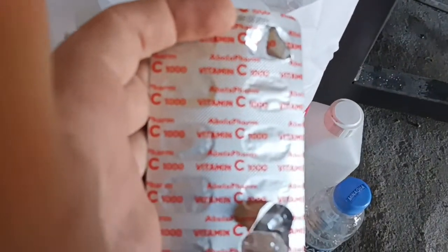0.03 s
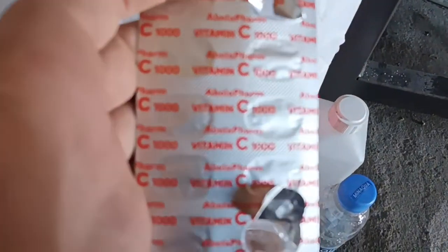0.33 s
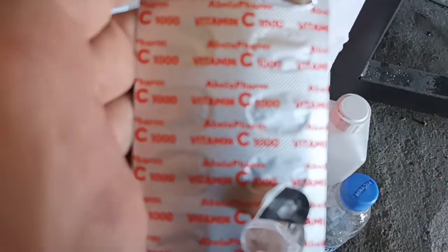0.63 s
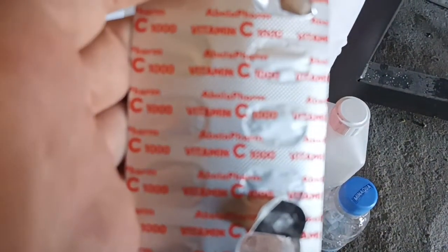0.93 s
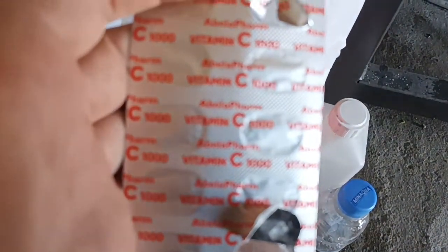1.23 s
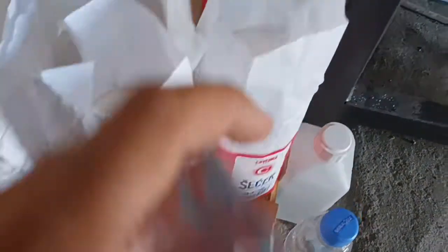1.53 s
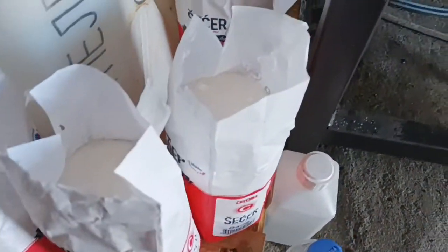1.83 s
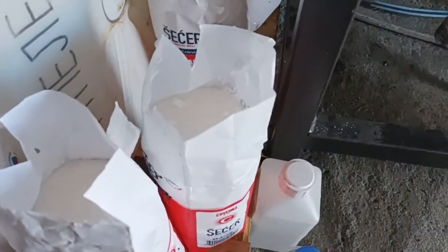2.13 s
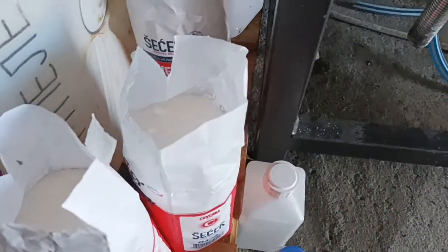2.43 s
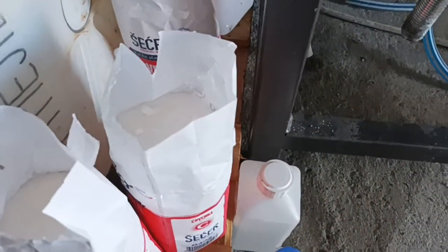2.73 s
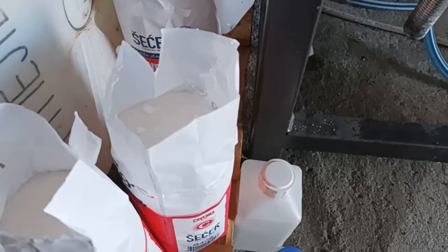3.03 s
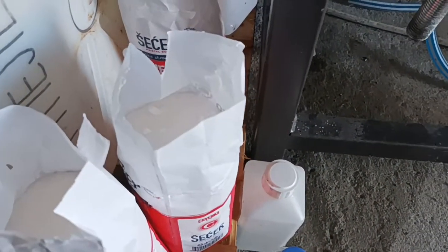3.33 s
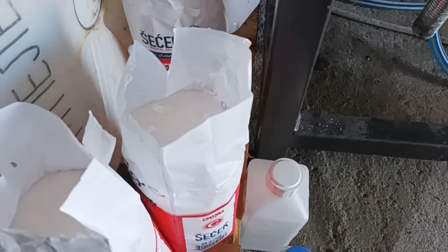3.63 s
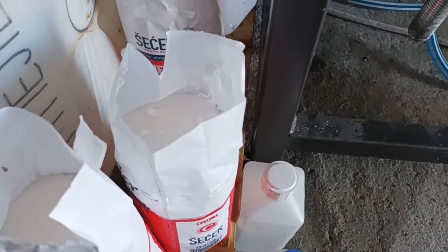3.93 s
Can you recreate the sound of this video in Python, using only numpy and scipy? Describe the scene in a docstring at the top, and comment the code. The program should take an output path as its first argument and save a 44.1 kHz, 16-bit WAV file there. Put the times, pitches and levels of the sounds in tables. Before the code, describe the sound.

Sharp snaps and crinkles of a foil pill pack give way to dense paper sack rustling.

```python
"""Sharp snaps of a foil blister pack, close to a phone, then separate crackles as it is moved aside.
Each blister flips, cracks and rings the foil sheet; fingers bump and skid over the pack.
Then a paper sack of sugar rustles densely, with sliding grains and sharp creases, in a small hard room.
Nearly all of it reaches the right microphone; the left one carries only a dull hiss."""
import sys
import numpy as np
from scipy import signal
from scipy.fft import rfft, irfft, next_fast_len
from scipy.io import wavfile

SR = 44100
rng = np.random.default_rng(int(sys.argv[2]) if len(sys.argv) > 2 else 0)


def materialize(psi):
    """Save the field psi as 16-bit PCM at rate SR to the path in sys.argv[1].

    A 1-D psi becomes a single channel; in a 2-D psi each row is a channel.
    """
    bounded = np.clip(np.atleast_2d(psi).T, -1, 1)
    quanta = np.round(bounded * 32767).astype(np.int16)
    wavfile.write(sys.argv[1], SR, quanta)


N = 176400

# blister flips (time [s], level [dB], pitch [Hz], t60 [s], second mode [Hz], then relative levels:
# second mode [dB], sheet [dB], crack [dB], air push [dB])
BLISTER_SNAPS = [(0.234, -55, 6250, 0.0091, 7450, -4, -8, 2, -30),
                 (0.4387, -20.5, 2167, 0.027, 5410, -19, 2, -6, -36),
                 (0.531, -33, 2110, 0.02, 1650, -1, -16, -6, -23),
                 (0.534, -20, 2380, 0.025, 4280, -3, 5.5, 0.5, -14.5),
                 (1.44, -37, 1880, 0.022, 2150, 9, -6, -29, -5),
                 (1.4538, -11.5, 2955, 0.014, 2220, -1, -16, -2.5, -22.5),
                 (1.4853, -15, 2300, 0.022, 7060, -8, -8, 0.5, -36),
                 (1.545, -29, 1830, 0.034, 2200, 3, -16, 6.5, -23),
                 (1.6103, -15, 2390, 0.024, 2620, -7, -24, 5.5, -15),
                 (1.969, -16.5, 2625, 0.022, 3024, -1.5, -2.5, -5.5, -30),
                 (2.0617, -14, 2450, 0.022, 4050, -11.5, -23, -20, -30),
                 (2.1341, -17, 2714, 0.029, 4410, -11, -24, -3.5, -43),
                 (2.173, -24, 2340, 0.031, 2760, -3, -10, -18, -17),
                 (2.181, -21.5, 2417, 0.031, 4420, -12, -10, -6, -30)]
# foil sheet modes (frequency [Hz], level [dB], t60 [s])
SHEET_MODES = [(3200, -4.5, 0.017), (3350, 2, 0.011), (3583, -7.5, 0.023), (5280, -30.5, 0.033),
               (5940, -19, 0.026), (7140, -20.5, 0.014), (8670, -23, 0.018)]
# crack spectrum (frequency [Hz], level [dB])
CRACK_SPECTRUM = [(100, -37), (500, -37), (1100, -32), (1800, -10), (2600, 2), (3600, -2.5), (5200, -11),
                  (7000, -6), (9000, -11.5), (11000, -26.5), (16000, -27)]


def blister_snaps():
    """A blister flips: it cracks, pushes the air, rings in two modes and shakes the foil sheet."""
    out, t = np.zeros(N), np.arange(SR // 20) / SR
    rise_s = 0.00092
    rise = np.sin(np.pi / 2 * np.minimum(t / rise_s, 1)) ** 2
    sheet = sum(undb(db) * ring(t, hz, t60_s) for hz, db, t60_s in SHEET_MODES)
    for time_s, db, hz, t60_s, mode2_hz, mode2_db, sheet_db, crack_db, push_db in BLISTER_SNAPS:
        blister = ring(t, hz, t60_s) + undb(mode2_db) * ring(t, mode2_hz, 0.8 * t60_s)
        crack = undb(crack_db - 7.5) * burst(t, CRACK_SPECTRUM, decay_s=0.0029)
        push = undb(push_db) * ring(t, hz=1120, t60_s=0.0087)
        snap = rise * (blister + undb(sheet_db) * sheet + crack) + push
        add(out, time_s, undb(db - 5.5) * snap)
    return out


# foil buckles (time [s], level [dB], pitch [Hz])
FOIL_CRACKLES = [(1.553, -38, 2300), (1.5762, -34, 2580), (1.5893, -26, 4500), (1.5945, -20.5, 1870),
                 (1.596, -34, 4020), (1.6078, -23, 4430), (1.6148, -27, 3840), (1.6262, -31, 7350),
                 (1.627, -29.5, 10500), (1.6336, -20.5, 4000), (1.6339, -27.5, 9200), (1.655, -29, 4500),
                 (1.6578, -18, 4940), (1.6652, -30, 3900), (1.6821, -26, 2270), (1.6855, -25, 1900),
                 (1.6925, -41, 8000), (1.7001, -27, 1370), (1.7043, -21, 4400), (1.7108, -25.5, 8400),
                 (1.7125, -19.5, 4560), (1.717, -28, 3650), (1.7275, -21, 4100), (1.7323, -18, 5140),
                 (1.7394, -17, 4800), (1.7436, -17, 5600), (1.7605, -28, 4960), (1.7674, -17.5, 3250),
                 (1.786, -32, 3370), (1.8645, -30, 5400), (1.914, -31, 2460), (2.0345, -37.5, 4270),
                 (2.0575, -28.5, 4970), (2.0635, -25, 4930), (2.1482, -32.5, 4530), (2.172, -34, 5200),
                 (2.1812, -29.5, 4760), (2.218, -33.5, 6170)]
# foil fracture spectrum (frequency [Hz], level [dB])
FOIL_SPECTRUM = [(100, -38), (600, -28), (1400, -10.5), (2400, -6.5), (4500, 1), (6200, 5.5), (8000, 1.5),
                 (10000, -18.5), (12000, -22), (16000, -29)]


def foil_crackles():
    """Foil folds buckle in bright ticks that barely ring."""
    return folds(FOIL_CRACKLES, FOIL_SPECTRUM, rise_s=0.00055, decay_s=0.0021, burst_db=-8,
                 ring_t60_s=0.0042, ring_db=-6)


# paper buckles (time [s], level [dB], pitch [Hz])
PAPER_CREASES = [(2.2555, -30.5, 3980), (2.262, -28, 3660), (2.2822, -27, 3400), (2.4655, -21, 1660),
                 (2.4662, -22, 4600), (2.5163, -25, 3270), (2.5402, -25, 4950), (2.544, -22, 3100),
                 (2.5495, -22, 2290), (2.6092, -21.5, 2420), (2.7412, -24, 2500), (2.7668, -22, 2610),
                 (2.8122, -19, 3500), (2.8128, -30, 6540), (2.823, -21, 3320), (2.892, -22, 2680),
                 (2.899, -19.5, 2780), (2.8995, -29.5, 5190), (2.9855, -25.5, 4380), (2.989, -18.5, 2900),
                 (3.109, -27.5, 2900), (3.143, -24, 2580), (3.1435, -28, 7440), (3.185, -21.5, 1800),
                 (3.2981, -24, 3080), (3.3445, -17.5, 2750), (3.4946, -41, 2600), (3.5131, -17.5, 2680),
                 (3.625, -32, 5600), (3.6498, -21, 1800), (3.7328, -25.5, 3100), (3.7332, -27.5, 6440),
                 (3.7515, -35, 6400), (3.7695, -28, 6650), (3.7798, -27, 3280), (3.7924, -23, 2700),
                 (3.7928, -20.5, 4000), (3.7932, -24.5, 7430), (3.8745, -37, 6340)]
# spectrum of creases and finger bumps (frequency [Hz], level [dB])
CREASE_SPECTRUM = [(100, -29), (600, -20.5), (1400, -18.5), (2600, -3), (4200, 7), (8000, -1.5),
                   (10000, -15.5), (16000, -27)]


def paper_creases():
    """The sack creases sharply and its paper facets ring briefly."""
    return folds(PAPER_CREASES, CREASE_SPECTRUM, rise_s=0.00035, decay_s=0.0027, burst_db=-8.5,
                 ring_t60_s=0.013, ring_db=-6.5)


# finger contacts (time [s], level [dB], pitch [Hz])
FINGER_BUMPS = [(1.567, -39, 646), (1.574, -36, 875), (1.627, -30, 820), (1.637, -44, 577),
                (1.660, -37, 895), (1.683, -32, 970), (1.7, -34, 1070), (1.708, -35, 700),
                (1.742, -40, 217), (1.785, -38, 645), (2.064, -32.5, 1030)]


def finger_bumps():
    """Fingers bump and skid over the pack: low knocks with a softer attack."""
    return folds(FINGER_BUMPS, CREASE_SPECTRUM, rise_s=0.0016, decay_s=0.0046, burst_db=-6.5,
                 ring_t60_s=0.016, ring_db=-7)


# sack rustle envelope (time [s], bass [dB], mids [dB], treble [dB])
SACK_ENVELOPE = [(2.24, -61, -53, -63), (2.3, -51.5, -41, -49), (2.34, -52, -45.5, -49.5),
                 (2.4, -49, -37, -44.5), (2.44, -50.5, -41.5, -47.5), (2.49, -50, -36, -42),
                 (2.55, -41.5, -34, -40.5), (2.58, -50, -40, -46.5), (2.64, -50, -40, -44.5),
                 (2.68, -44.5, -36.5, -40.5), (2.72, -49.5, -40, -47), (2.79, -46, -38.5, -43.5),
                 (2.83, -46, -36.5, -37.5), (2.87, -51, -39.5, -46), (2.92, -48, -38, -41),
                 (3.0, -48.5, -36, -45), (3.04, -55.5, -45, -50), (3.09, -50.5, -43, -52),
                 (3.14, -54.5, -44, -46), (3.19, -51, -36.5, -44.5), (3.22, -53.5, -46, -51.5),
                 (3.28, -52.5, -44.5, -50), (3.31, -51, -38.5, -35.5), (3.35, -47.5, -36.5, -43),
                 (3.4, -46.5, -44.5, -46), (3.46, -49.5, -38, -42), (3.51, -46.5, -37.5, -37),
                 (3.56, -51.5, -42.5, -48), (3.65, -50.5, -40, -44), (3.71, -50.5, -41.5, -47.5),
                 (3.77, -52.5, -41, -45.5), (3.85, -48.5, -41.5, -45.5), (3.9, -61.5, -52.5, -58),
                 (3.96, -48, -42, -45), (3.995, -54, -44, -45)]
# sack rustle spectrum (frequency [Hz], level [dB])
SACK_SPECTRUM = [(50, -30.5), (140, -16), (300, -13.5), (450, -13), (560, -19), (700, -6.5), (870, -13),
                 (1150, -9), (1650, -2), (1950, -4.5), (2450, -0.5), (3100, -2.5), (4000, -6), (6000, -4.5),
                 (7800, -6), (9500, -18), (12000, -27), (16000, -31.5)]


def sack_rustle():
    """Paper crinkles and sugar slides in dense, fairly even slips."""
    slips = grains(rate_per_s=1200, spread_db=3.5, decay_s=0.0029)
    return rustle(slips, SACK_ENVELOPE, SACK_SPECTRUM, slide_db=-4.5, gain_db=-1.47)


# pack rustle envelope (time [s], bass [dB], mids [dB], treble [dB])
PACK_ENVELOPE = [(1.44, -82, -75, -83), (1.52, -66, -55, -54), (1.555, -52, -45, -82),
                 (1.58, -46.5, -41.5, -49), (1.605, -49, -31.5, -33), (1.645, -48.5, -47.5, -57),
                 (1.7, -48, -42.5, -55), (1.74, -65, -37, -54), (1.79, -57, -48, -42),
                 (1.83, -59.5, -53.5, -58), (1.87, -52.5, -47, -50), (1.96, -54, -57, -53),
                 (2.04, -52.5, -56, -60), (2.065, -49, -38.5, -52), (2.09, -54, -63, -56.5),
                 (2.18, -56.5, -53, -56), (2.24, -53, -53, -53), (2.3, -92, -72, -84)]
# pack rustle spectrum (frequency [Hz], level [dB])
PACK_SPECTRUM = [(71, -35), (120, -22.5), (334, -12.5), (410, -15), (454, -18), (503, -14.5), (856, -12.5),
                 (1290, -8.5), (2340, 9), (2530, 6), (4590, -5), (6500, -15), (7820, -16.5), (11500, -34.5),
                 (16000, -42)]


def pack_rustle():
    """The moving pack crinkles in very uneven slips."""
    slips = grains(rate_per_s=910, spread_db=10, decay_s=0.0032)
    return rustle(slips, PACK_ENVELOPE, PACK_SPECTRUM, slide_db=-2.5, gain_db=-3.5)


def folds(events, spectrum, rise_s, decay_s, burst_db, ring_t60_s, ring_db):
    """A fold buckles or is bumped: a burst of fractures rings the damped facet beside it."""
    out, t = np.zeros(N), np.arange(SR // 25) / SR
    rise = np.minimum(t / rise_s, 1)
    for time_s, db, hz in events:
        crack = burst(t, spectrum, decay_s)
        ringing = signal.fftconvolve(crack, ring(t, hz, ring_t60_s))[:len(t)]
        facet = unit(ringing) * np.std(crack)
        add(out, time_s, undb(db) * rise * (undb(burst_db) * crack + undb(ring_db) * facet))
    return out


def burst(t, spectrum, decay_s):
    """Tiny fractures: decaying coloured noise with the energy of its envelope."""
    envelope = np.exp(-t / decay_s)
    fractures = colour(rng.standard_normal(len(t)) * envelope, spectrum)
    return unit(fractures) * np.sqrt(np.mean(envelope ** 2))


def ring(t, hz, t60_s):
    """One struck mode."""
    return np.sin(2 * np.pi * hz * t) * fade(t, t60_s)


def grains(rate_per_s, spread_db, decay_s):
    """Many tiny slips, mostly weak, a few strong, each a puff of noise."""
    onsets = rng.random(N) < rate_per_s / SR
    hits = onsets * undb(spread_db * np.minimum(rng.exponential(size=N), 3))
    power = signal.lfilter([1], [1, -np.exp(-2 / (decay_s * SR))], hits ** 2)
    return unit(np.sqrt(power + 1e-18) * rng.standard_normal(N))


def rustle(slips, envelope, spectrum, slide_db, gain_db):
    """Grainy slips over smooth sliding; three bands follow their own levels."""
    t = np.arange(N) / SR
    times_s, *levels_db = np.array(envelope).T
    slide = undb(slide_db) * rng.standard_normal(N)
    bands = split(colour(slips + slide, spectrum), low_hz=1300, high_hz=4000)
    gains = [undb(gain_db + np.interp(t, times_s, db, left=-120)) for db in levels_db]
    return sum(unit(band) * gain for band, gain in zip(bands, gains))


def room(x, wet_db, t60_s=0.55, treble_t60_s=0.47, delay_s=0.0075):
    """Close hard walls add a diffuse tail whose treble dies sooner."""
    t = np.arange(N) / SR
    bass, mids, treble = split(rng.standard_normal(N), low_hz=1000, high_hz=7200)
    tail = ((bass + mids) * fade(t, t60_s) + treble * fade(t, treble_t60_s)) * (t > delay_s)
    tail /= np.sqrt(np.sum(tail ** 2))
    return x + undb(wet_db) * signal.fftconvolve(x, tail)[:N]


# hiss spectrum at each microphone (frequency [Hz], level [dB])
LEFT_HISS = [(25, -45), (50, -14), (80, -1), (150, -0.5), (300, -6.5), (600, -11.5), (1200, -16.5),
             (2800, -22.5), (5000, -35.5), (9000, -48.5), (16000, -55)]
RIGHT_HISS = [(25, -27), (55, -4), (110, 4), (170, -2), (400, -5.5), (800, -10.5), (1800, -16.5),
              (3000, -20.5), (5000, -29), (7500, -37), (10000, -43), (16000, -53)]


def hiss():
    """Steady dull noise, independent left and right."""
    return [undb(db) * unit(colour(rng.standard_normal(N), spectrum))
            for spectrum, db in ((LEFT_HISS, -60), (RIGHT_HISS, -63.5))]


def colour(x, spectrum):
    """Causal filter through (Hz, dB) points; keeps the power of white noise."""
    hz, db = np.array(spectrum).T
    size = 2 * next_fast_len(len(x))
    bins_hz = np.fft.rfftfreq(size, 1 / SR)
    gain = unit(undb(np.interp(np.log(bins_hz + 1), np.log(hz), db)))
    cepstrum = irfft(np.log(gain))
    cepstrum[1:size // 2] *= 2  # fold to minimum phase
    cepstrum[size // 2 + 1:] = 0
    return irfft(rfft(x, size) * np.exp(rfft(cepstrum)))[:len(x)]


def split(x, low_hz, high_hz):
    """Bass, mids and treble that sum to x."""
    bins_hz, spectrum = np.fft.rfftfreq(N, 1 / SR), rfft(x)
    low, high = (1 / (1 + (bins_hz / hz) ** 8) for hz in (low_hz, high_hz))
    return [irfft(spectrum * gain, N) for gain in (low, high - low, 1 - high)]


def fade(t, t60_s):
    """Exponential decay, 60 dB down at t60_s."""
    return np.exp(-np.log(1000) * t / t60_s)


def undb(db):
    """Decibels to gain."""
    return 10 ** (np.asarray(db) / 20)


def unit(x):
    """Scale to rms 1."""
    return x / np.sqrt(np.mean(x ** 2))


def add(out, time_s, x):
    """Mix x in at time_s."""
    start = int(time_s * SR)
    out[start:start + len(x)] += x[:max(len(out) - start, 0)]


def scene(left_mic_db=-57, right_mic_db=6):
    """The pack, then the sack, in the room at two very unequal microphones."""
    clicks = foil_crackles() + finger_bumps() + paper_creases()
    pack, sack = pack_rustle(), sack_rustle()
    handling = room(blister_snaps(), wet_db=-12.5) + room(clicks, wet_db=-16.5)
    handling += room(pack, wet_db=-10) + room(sack, wet_db=-12)
    left_hiss, right_hiss = hiss()
    return np.array([undb(left_mic_db) * handling + left_hiss,
                     undb(right_mic_db) * handling + right_hiss])


def record(dry):
    """The phone cuts the top with a steep low-pass."""
    cutoff_hz = 15900
    return signal.sosfilt(signal.ellip(10, .2, 80, cutoff_hz, fs=SR, output="sos"), dry)


dry = scene()
out = record(dry)
materialize(out)
```